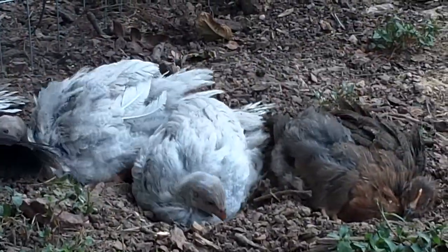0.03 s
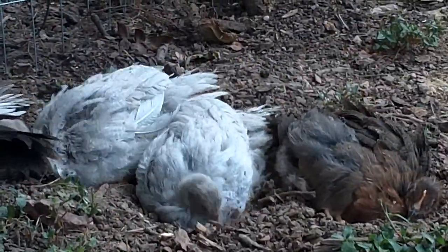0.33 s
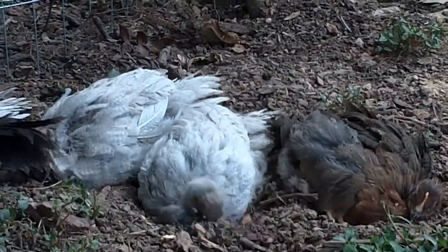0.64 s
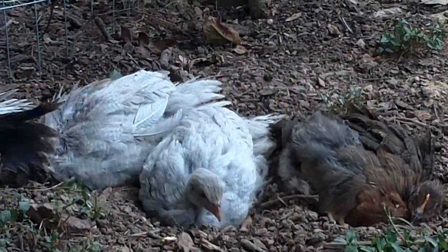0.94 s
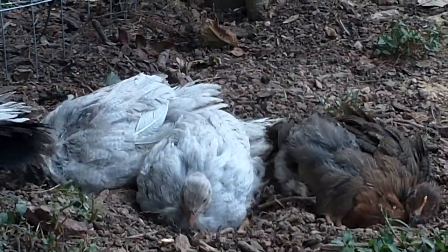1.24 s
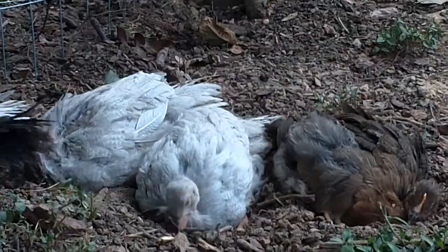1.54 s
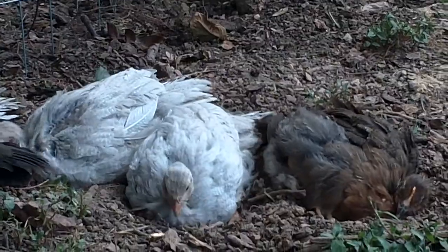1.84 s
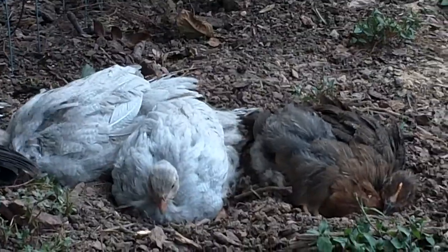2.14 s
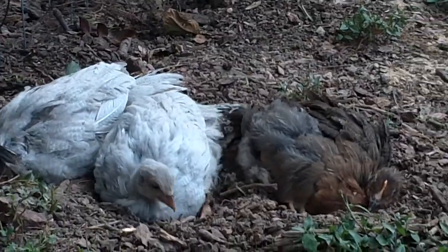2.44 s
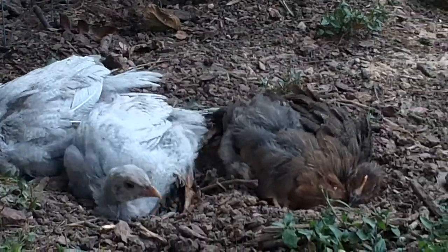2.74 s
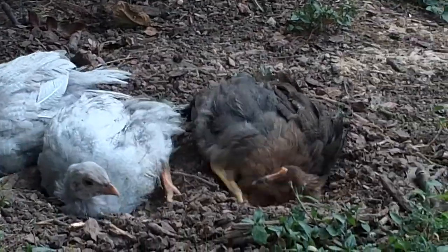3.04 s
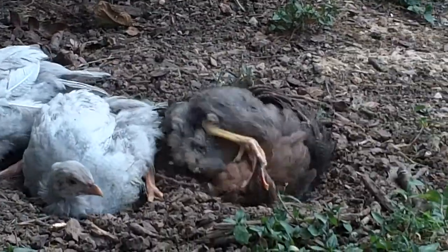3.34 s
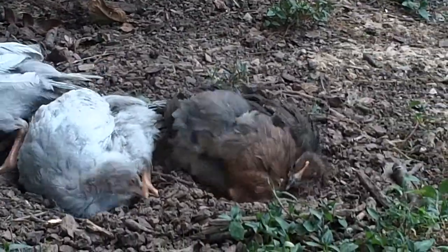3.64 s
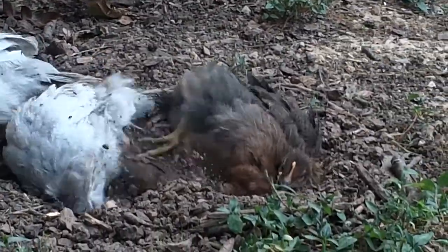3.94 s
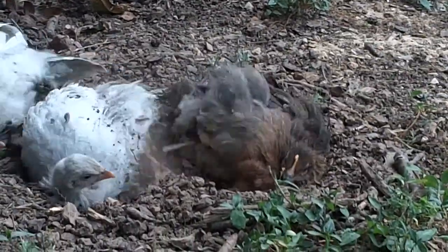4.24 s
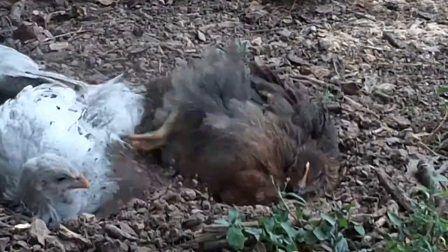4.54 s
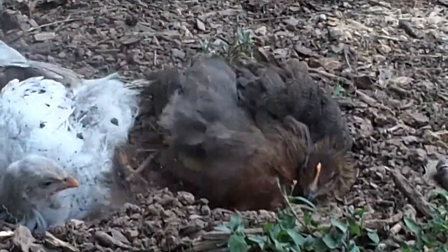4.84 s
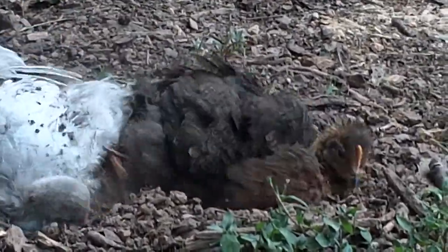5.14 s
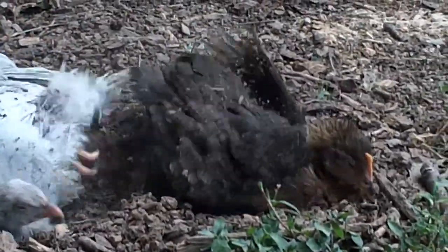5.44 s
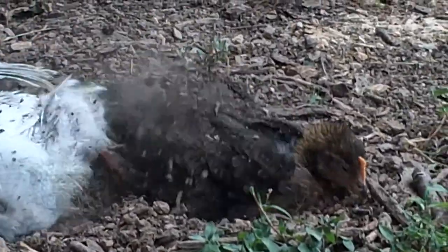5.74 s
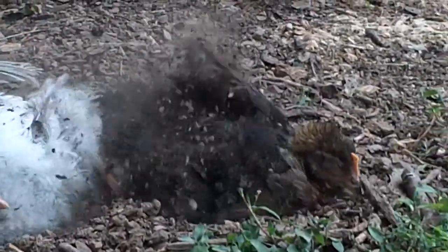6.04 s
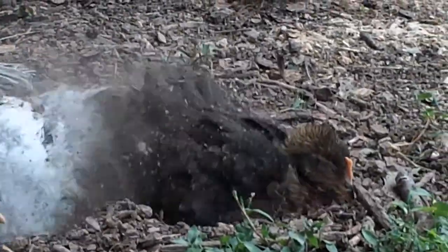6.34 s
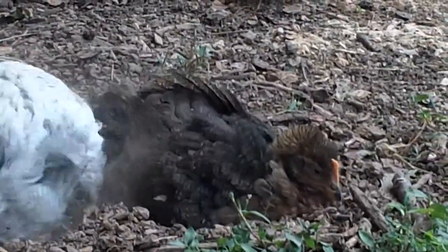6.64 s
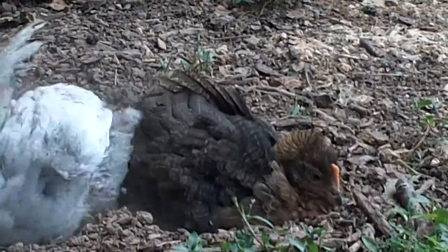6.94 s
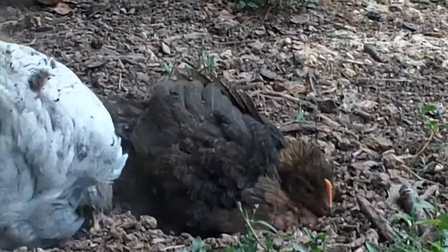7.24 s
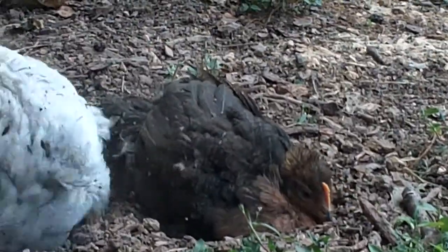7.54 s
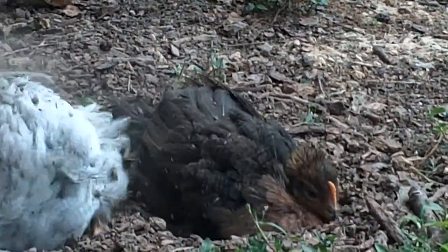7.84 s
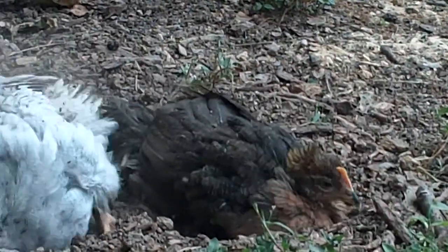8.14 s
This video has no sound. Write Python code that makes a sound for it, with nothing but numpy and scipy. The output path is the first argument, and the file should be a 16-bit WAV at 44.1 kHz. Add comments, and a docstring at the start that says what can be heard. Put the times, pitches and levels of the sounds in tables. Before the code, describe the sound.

A breeze buffets the microphone with lumpy low rumble and soft thumps, strongest between about 0.5 and 1 second, then coming in weaker gusts and easing toward the end. Throughout there is an even outdoor hiss, a high shimmering insect drone with one faint cricket, and a distant motor hum. A small bird some way off gives short high chirps at about 2 seconds and around 3.5, with fainter ones later. From about 2.7 seconds young chickens close by peep softly at intervals until the end. Between 4 and 7.6 seconds they kick in dry soil, and grit falls back in faint sprays of tiny clicks, with sharper ticks near 6.7 and 7.4. Far vehicles pass faintly around 4, 5 and 7 seconds. At about 7.2 seconds one chicken gives a short, high, rapid trill that stands out clearly, followed by a few more soft peeps.

```python
"""A breeze buffets the microphone with lumpy rumble and soft thumps, outdoors in a garden.
Insects drone in the trees, one cricket stands out, and traffic and a motor hum far off. A small bird
chirps some way away, at times with both sides of its syrinx. Close by, young chickens dust-bathe in dry
soil, peeping softly; their kicks throw up grit and leaf litter that fall back as tiny clicks.
Near the end one chicken gives a short trill."""
import sys
import numpy as np
from scipy import signal
from scipy.fft import rfft, irfft, next_fast_len
from scipy.io import wavfile
from scipy.ndimage import map_coordinates

SR = 44100
rng = np.random.default_rng(int(sys.argv[2]) if len(sys.argv) > 2 else 0)


def unload_audio(sound):
    """Save the sound as a 16-bit wav file, at the path given as the first command line argument."""
    columns = np.transpose(np.atleast_2d(sound))
    # keep every value between -1 and 1, then stretch to whole-number steps
    steps = np.round(np.clip(columns, -1, 1) * 32767)
    wavfile.write(sys.argv[1], SR, steps.astype(np.int16))


N = 369999
TIME = np.arange(N) / SR


def from_db(db):
    """Decibels to gain."""
    return 10 ** (np.asarray(db) / 20)


def in_time(curve):
    """A level at every sample, on straight lines between the curve's points."""
    return np.interp(TIME, *np.transpose(curve))


def coloured(x, spectrum):
    """Give a signal a smooth spectrum; rms 1."""
    hz, db = np.transpose(spectrum)
    size = next_fast_len(N)
    bins = np.maximum(np.fft.rfftfreq(size, 1 / SR), 1)
    gain = from_db(np.interp(np.log(bins), np.log(hz), db))
    shaped = irfft(rfft(x, size) * gain, size)[:N]
    return shaped / np.sqrt(np.mean(shaped ** 2) + 1e-20)


def noise(spectrum):
    """Steady noise of a given colour; rms 1."""
    return coloured(rng.standard_normal(N), spectrum)


def drift(rate, size=N):
    """Smooth chance that changes about rate times a second; spread near 1."""
    steps = np.arange(size) / SR * rate
    return map_coordinates(rng.standard_normal(4096), [steps], order=3, mode="wrap")


def add(out, s, sound):
    """Mix a sound in from time s."""
    start = max(round(s * SR), 0)
    out[start:start + len(sound)] += sound[:N - start]


def phase_of(hz):
    """Running phase of a gliding pitch."""
    return 2 * np.pi * np.cumsum(hz) / SR


# Strength of the breeze at the microphone: (time [s], relative level [dB])
BREEZE_LEVEL = [(0.0, -39.5), (0.3, -37), (0.72, -32), (1.1, -40), (1.56, -35.5), (1.96, -42.5),
                (2.22, -35), (2.73, -46), (3.48, -46), (3.67, -40.5), (4.28, -38.5), (6.49, -47),
                (6.82, -41.5), (8.39, -51.5)]
# Colour of its rumble: (frequency [Hz], relative density [dB])
BREEZE_SPECTRUM = [(10, -6), (22, 3.5), (55, -2), (110, -6.5), (175, -19.5), (250, -31), (500, -32),
                   (1500, -84)]


def breeze(gain_db=3.0, lumpy_db=1.5):
    """Moving air makes a lumpy rumble right on the microphone's port."""
    return from_db(in_time(BREEZE_LEVEL) + gain_db + lumpy_db * drift(22)) * noise(BREEZE_SPECTRUM)


# Hiss of the open air all round the microphone: (time [s], relative level [dB])
AIR_LEVEL = [(0.0, -56.5), (2.29, -54.5), (8.39, -58.5)]
# Its colour: (frequency [Hz], relative density [dB])
AIR_SPECTRUM = [(20, 14.5), (120, 13), (220, 8), (600, 5), (1000, 3.5), (2200, -0.94), (5000, -8),
                (6500, -5.5), (7300, -14), (8400, -20), (10200, -21), (12000, -26), (15200, -29)]


def open_air(gain_db=8.5):
    """The garden's even background hiss, strongest in the bass."""
    return from_db(in_time(AIR_LEVEL) + gain_db) * noise(AIR_SPECTRUM)


# The insect chorus up in the trees: (time [s], level [dB])
INSECT_LEVEL = [(0.0, -51.5), (2.99, -49), (6.75, -52), (8.39, -53)]
# Its band: (frequency [Hz], relative density [dB])
INSECT_SPECTRUM = [(1500, -67), (2600, -26), (3200, -6.5), (3800, -2), (4400, 0), (4930, 0), (5060, -6),
                   (7000, -48)]


def insects(shimmer_db=1.05):
    """Many insects blend into one high, shimmering band of noise."""
    return from_db(in_time(INSECT_LEVEL) + shimmer_db * drift(60)) * noise(INSECT_SPECTRUM)


# Vehicles on a far road: (time when nearest [s], time to fade by 3 dB [s], relative level [dB])
VEHICLES = [(3.8, 0.54, -51.5), (5.15, 0.33, -50), (7.1, 0.7, -51.5)]
# Their colour as heard from the garden: (frequency [Hz], relative density [dB])
TRAFFIC_SPECTRUM = [(60, -52), (150, -22), (225, -14.5), (280, 3.5), (355, 3.5), (450, -1), (560, -12.5),
                    (900, -25), (3000, -82)]


def traffic(gain_db=1.5):
    """Each vehicle drives by on a straight road, its amplitude going as one over its distance."""
    power = sum(from_db(db) ** 2 / (1 + ((TIME - s) / fade) ** 2) for s, fade, db in VEHICLES)
    return from_db(gain_db) * np.sqrt(power) * noise(TRAFFIC_SPECTRUM)


# Partials of a distant motor: (frequency [Hz], level [dB])
MOTOR_PARTIALS = [(60, -55.5), (120, -53.5)]


def motor():
    """A motor hums on two low tones, each wandering slowly in phase."""
    return sum(np.sqrt(2) * from_db(db) * np.sin(2 * np.pi * hz * TIME + 0.94 * drift(3))
               for hz, db in MOTOR_PARTIALS)


def cricket(hz=4440, db=-63.5, swell_db=0.5, waver_hz=45):
    """One far cricket stands out of the chorus as a thin wavering whistle."""
    level = from_db(db - swell_db * drift(2.66))
    return np.sqrt(2) * level * np.sin(phase_of(hz + waver_hz * drift(120)))


# Kicks in the dust bath, near the microphone: (time [s], settling time [s], relative level [dB])
KICKS = [(4.11, .06, -68), (4.29, .05, -67), (4.47, .05, -67), (5.33, 0.089, -67), (5.85, .1, -70),
         (6.14, .13, -65.5), (6.38, .06, -68), (7.25, .04, -72), (7.35, .04, -67), (7.57, .06, -67)]
# Colour of the falling grit: (frequency [Hz], relative density [dB])
GRIT_SPECTRUM = [(1500, -18), (3500, 4), (6500, 8), (8500, 3), (12000, 0), (15000, -15)]


def falling_grit(grains_per_s=1000, attack_s=.025, trickle_db=-76, gain_db=3.0):
    """Earth falls as clumps of tiny clicks: a faint trickle, and a spray that settles after each kick."""
    falls = rng.random(N) < grains_per_s * from_db(3 * drift(40)) / SR
    sizes = from_db(3.8 * np.minimum(rng.exponential(1, N), 4)) * rng.choice([-1, 1], N)
    bursts = (from_db(db) * np.exp(-np.maximum((s - TIME) / attack_s, (TIME - s) / settling))
              for s, settling, db in KICKS)
    spray = np.sqrt(from_db(trickle_db) ** 2 + sum(burst ** 2 for burst in bursts))
    return from_db(gain_db) * spray * coloured(falls * sizes, GRIT_SPECTRUM)


# Single eddies striking the microphone: (time [s], length [s], level [dB], cutoff [Hz])
EDDIES = [(0.019, 0.02, -34, 242), (0.353, 0.0078, -29, 168), (0.49, 0.016, -14.5, 72.4),
          (0.609, 0.012, -24.5, 225), (0.656, 0.011, -28, 330), (0.673, 0.0093, -24.5, 600),
          (0.688, 0.014, -16, 455), (.713, 0.012, -14, 175), (0.7295, 0.006, -18, 720),
          (0.747, .019, -18.5, 159), (0.826, 0.03, -22.5, 56), (.886, 0.003, -18, 252),
          (.9, 0.0044, -27.5, 380), (0.973, 0.0091, -19.5, 147), (1.241, .06, -30, 149),
          (1.362, 0.013, -24, 228), (1.58, 0.21, -31, 80), (2.315, 0.011, -23.5, 122),
          (2.329, 0.013, -29, 360), (2.375, 0.014, -27.5, 193), (3.769, 0.022, -29.5, 171),
          (4.617, 0.029, -33, 72), (5.113, 0.1, -32.5, 103)]


def eddies(spike_db=-6.0, rise_ratio=0.56):
    """Soft thumps: each a pressure spike with a turbulent wake, of its own length and brightness."""
    out = np.zeros(N)
    t = np.arange(-SR // 4, SR // 4) / SR
    for s, length, db, top_hz in EDDIES:
        width_s = length * np.where(t < 0, rise_ratio, 1)
        wake = rng.standard_normal(len(t)) * np.exp(-(t / width_s) ** 2)
        puff = wake / np.linalg.norm(wake) + from_db(spike_db) * (t == 0)
        puff = signal.sosfilt(signal.butter(3, top_hz, fs=SR, output="sos"), puff)
        puff = signal.sosfilt(signal.butter(1, [25, top_hz * 0.72], "band", fs=SR, output="sos"), puff)
        puff *= from_db(db) * np.sqrt(length * SR / np.sum(puff ** 2))
        start = s + t[0] - .5 / top_hz   # a slow eddy takes half a cycle to build up
        add(out, start, puff[max(round(-start * SR), 0):])
    return out


# Short sharp ticks close by: (time [s], peak level [dB], ring frequency [Hz])
SHARP_TICKS = [(.268, -56, 10000), (3.987, -55, 10000), (4.105, -56, 12500), (4.464, -57, 12500),
               (4.883, -57, 11000), (5.847, -53, 12000), (6.398, -56, 13000), (6.658, -37, 5500),
               (7.371, -39, 5500), (7.533, -57, 12000)]


def sharp_ticks(q=3.9, decay_s=0.0016):
    """Cracks that ring for an instant: crumbs, twigs, and the click of a chicken's chip in its trill."""
    out = np.zeros(N)
    t = np.arange(SR // 30) / SR
    for s, db, hz in SHARP_TICKS:
        b, a = signal.iirpeak(hz, q, fs=SR)
        crack = rng.standard_normal(len(t)) * np.exp(-t / decay_s)
        ring = signal.lfilter(b, a, signal.lfilter(b, a, crack))
        add(out, s, from_db(db) * ring / np.abs(ring).max())
    return out


def syrinx_note(length, pitch_hz, glide_hz, arch_hz, edge, waver=.011, rough_db=2.0):
    """A pitch that arches over a glide, and an envelope that swells, flutters and fades with the breath."""
    u = np.linspace(0, 1, int(length * SR))
    droop = np.abs(2 * u - 1) ** 2.86   # flatter on top and steeper at the ends than a parabola
    hz = (pitch_hz + glide_hz * (u - .5) - arch_hz * droop) * (1 + waver * drift(256, len(u)))
    swell = np.sqrt(2) * np.abs(np.sin(np.pi * u)) ** edge
    flutter = from_db(rough_db * drift(237, len(u)))
    return hz, swell * flutter


# A small bird, some way from the microphone: (time [s], length [s], pitch [Hz], glide [Hz], arch [Hz],
# relative level [dB], second voice's starting offset [Hz], 0 for none)
CHIRPS = [(2.04, 0.074, 3880, -650, 496, -43, -300), (2.38, .052, 3570, -280, 260, -50, 0),
          (3.341, .069, 4115, 98, 602, -40, -300), (3.541, 0.05, 3890, -120, 398, -43.5, 0),
          (3.86, .066, 3300, -600, 0, -61, -0.5), (5.497, 0.059, 3980, -220, 450, -52.5, -3),
          (5.67, .065, 3300, -160, -2, -58.5, 0), (5.968, .075, 3650, -570, 60, -56.5, 0),
          (6.64, 0.061, 3420, -870, -220, -55, 2), (8.261, 0.048, 3550, -470, 0, -43, 1203)]


def small_bird(second_voice_db=-7.0, closing=0.77, gain_db=1.5):
    """Nearly pure chirps; in some the other side of the syrinx joins in and closes on the first voice."""
    out = np.zeros(N)
    for s, length, pitch_hz, glide_hz, arch_hz, db, apart_hz in CHIRPS:
        hz, swell = syrinx_note(length, pitch_hz, glide_hz, arch_hz, edge=.55)
        second_hz = hz + apart_hz * (1 - closing * np.linspace(0, 1, len(hz)))
        second = from_db(second_voice_db) * (apart_hz != 0) * np.sin(phase_of(second_hz))
        add(out, s, from_db(db + gain_db) * swell * (np.sin(phase_of(hz)) + second))
    return out


# Chickens close to the microphone: (time [s], length [s], pitch [Hz], glide [Hz], relative level [dB])
PEEPS = [(2.675, 0.05, 2350, -460, -48.5), (2.73, 0.05, 1777, -250, -48.5), (2.988, .02, 2490, 49.5, -47),
         (4.266, .059, 2620, 60, -49), (4.434, 0.041, 2820, 1100, -49), (4.643, 0.029, 2410, 700, -44),
         (4.931, 0.065, 2380, -110, -50), (5.79, .05, 2460, 140, -53), (6.222, .068, 2460, -180, -42),
         (6.755, .05, 2470, 100, -60), (7.262, 0.065, 2500, 0, -50), (7.369, 0.0059, 2090, -100, -31.5),
         (7.562, 0.048, 2550, 93, -43), (7.935, .053, 2015, -210, -52), (8.06, 0.046, 2570, 202, -43.5)]


def chicken_peeps(harmonics_db=(0, -3.0, -32, -28), gain_db=-3.5):
    """Soft contented notes: a fundamental, its octave and a trace of higher overtones."""
    out = np.zeros(N)
    for s, length, pitch_hz, glide_hz, db in PEEPS:
        hz, swell = syrinx_note(length, pitch_hz, glide_hz, arch_hz=199, edge=.6)
        tone = sum(gain * np.sin(k * phase_of(hz)) for k, gain in enumerate(from_db(harmonics_db), 1))
        add(out, s, from_db(db + gain_db) * swell * tone)
    return out


def chicken_trill(start_s=7.219, length_s=.19, fade_s=.045, db=-30, trough_db=-12.0, rough_db=2.5):
    """A whistle swept up and down some 45 times a second, nearly choking at the bottom of each dip."""
    t = np.arange(0, length_s, 1 / SR)
    warble = phase_of(47.4 - 27 * t) + 2 * np.pi * .18   # slows as it goes on
    dip = (1 + np.cos(warble)) / 2 - 0.1 * np.sin(warble) ** 2   # round arches, narrow troughs
    top_hz = 4650 - 620 * t + 120 * drift(46.3, len(t))   # the tops sink a little, unsteadily
    depth_hz = 1600 * (1 - np.exp(-t / .028))   # the dips open up quickly
    hz = top_hz - depth_hz * dip + 45 * drift(520, len(t))
    envelope = np.clip(np.minimum(t, length_s - t) / fade_s, 0, 1)
    level = from_db(db + trough_db * dip ** 2 + rough_db * drift(304, len(t)))
    out = np.zeros(N)
    add(out, start_s, np.sqrt(2) * envelope * level * np.sin(phase_of(hz)))
    return out


def among_trees(x, wet_db, t60_s):
    """Trunks and leaves scatter a faint short tail back to the microphone."""
    t = np.arange(SR // 2) / SR
    tail = rng.standard_normal(len(t)) * from_db(-60 * t / t60_s)
    return x + from_db(wet_db) * signal.fftconvolve(x, tail / np.linalg.norm(tail))[:N]


def scene():
    """One microphone in the garden: the chickens are close and dry, the small bird is farther off."""
    chickens = among_trees(chicken_peeps() + chicken_trill(), wet_db=-25.0, t60_s=.15)
    bird = among_trees(small_bird(), wet_db=-13.0, t60_s=0.18)
    clicks = falling_grit() + sharp_ticks()
    wind = breeze() + eddies()
    garden = open_air() + insects() + traffic() + motor() + cricket()
    return (wind + garden + clicks + bird + chickens)[None]


# Dips in the response of the camera that holds the microphone: (frequency [Hz], width [Hz])
CAMERA_NOTCHES = [(2705, 420), (5500, 600), (7870, 1300), (10950, 750)]


def record(dry):
    """The camera notches out four narrow bands and cuts the top above 15.2 kHz."""
    for hz, width_hz in CAMERA_NOTCHES:
        dry = signal.lfilter(*signal.iirnotch(hz, hz / width_hz, fs=SR), dry)
    return signal.sosfilt(signal.ellip(12, .1, 90, 15200, fs=SR, output="sos"), dry)


dry = scene()
out = record(dry)
unload_audio(out)
```